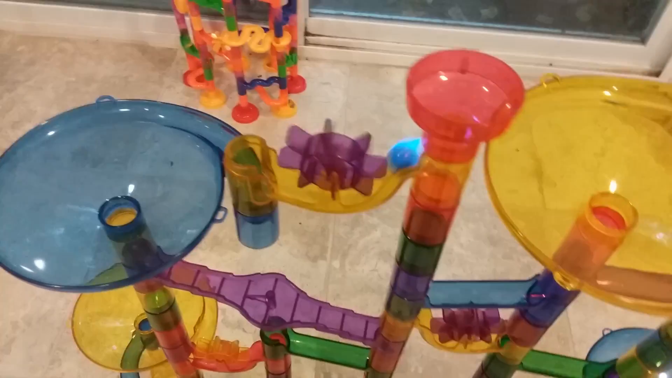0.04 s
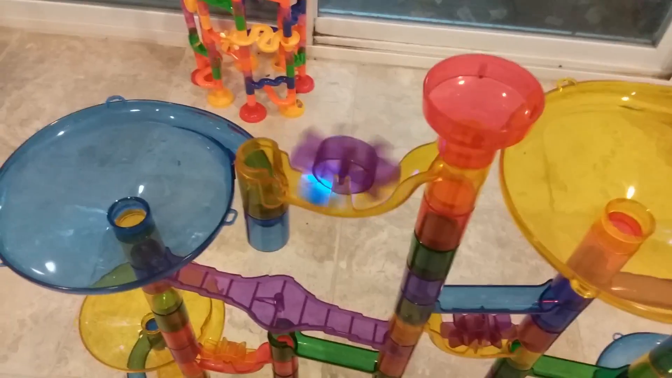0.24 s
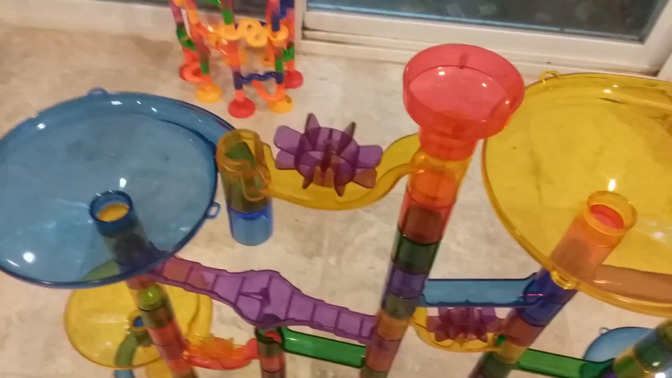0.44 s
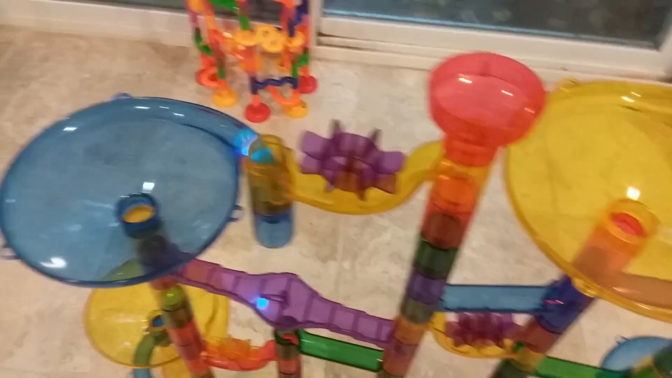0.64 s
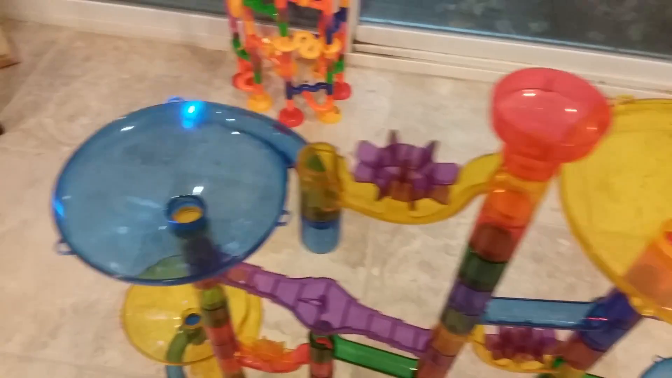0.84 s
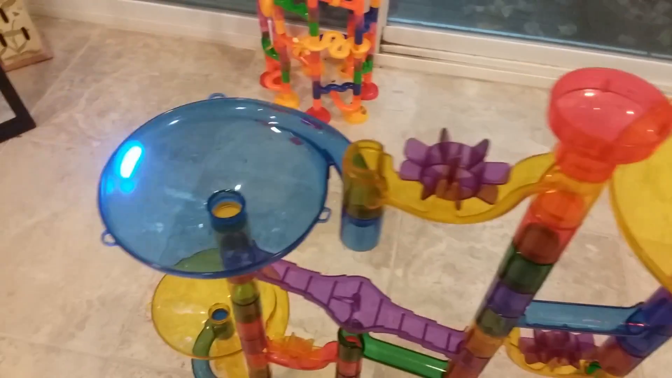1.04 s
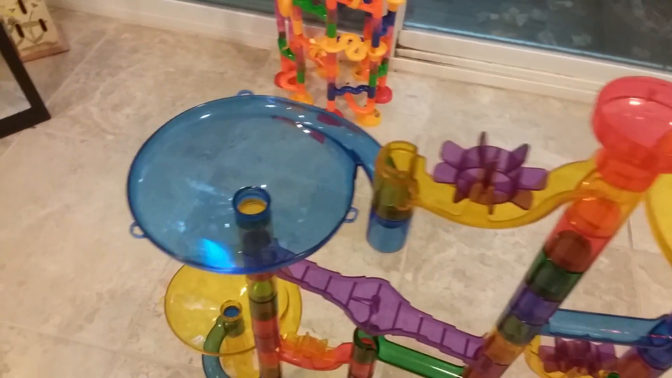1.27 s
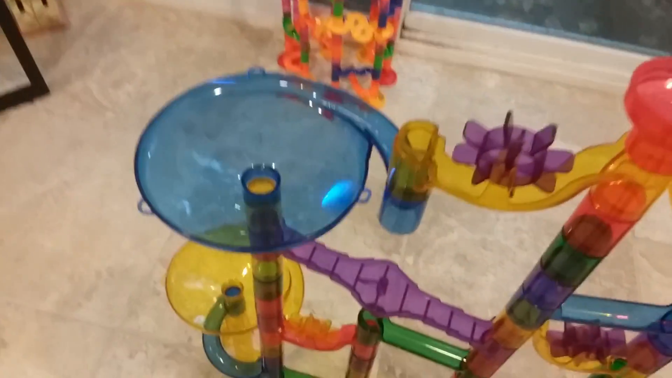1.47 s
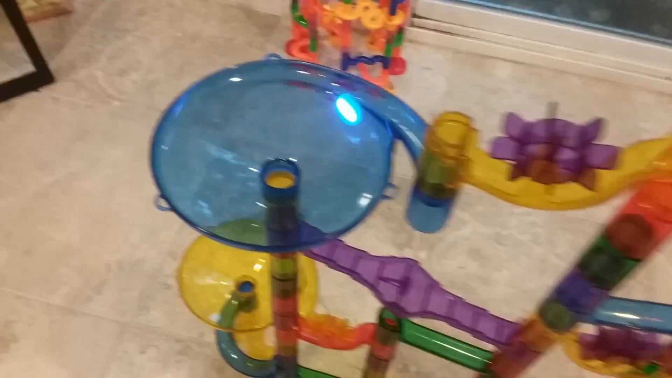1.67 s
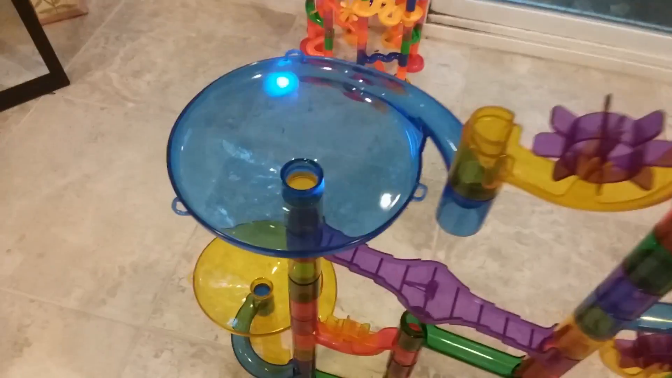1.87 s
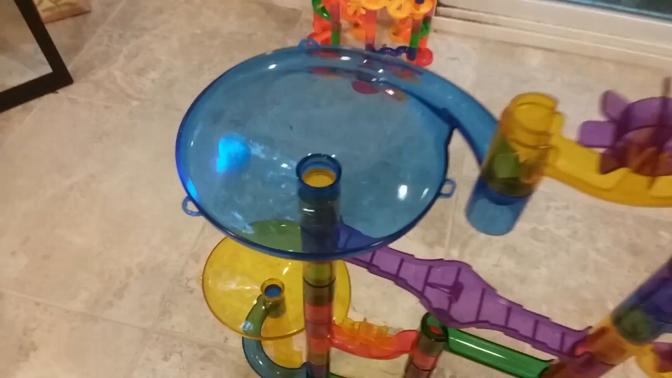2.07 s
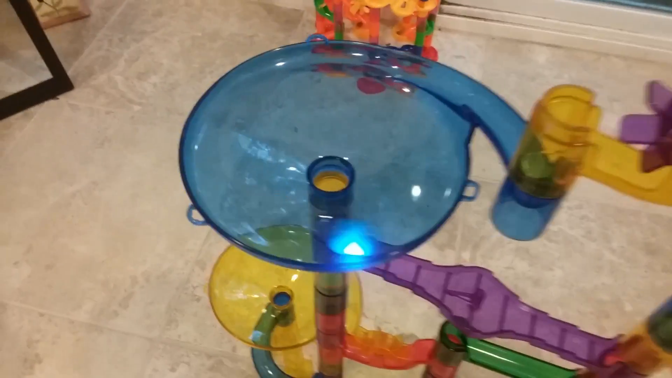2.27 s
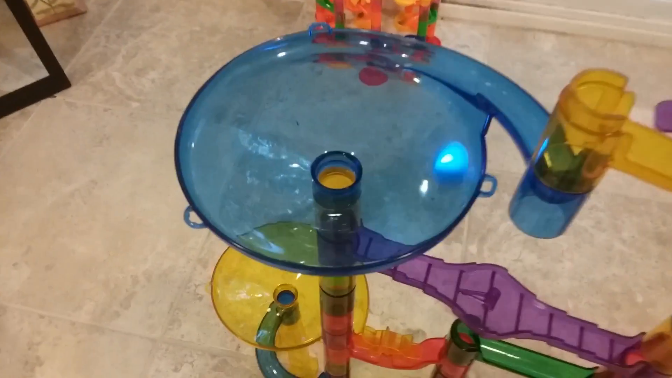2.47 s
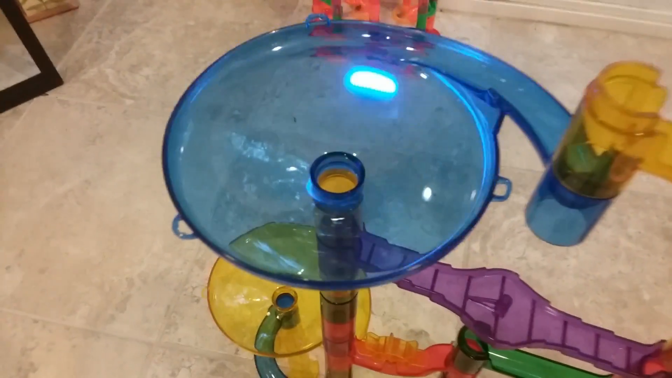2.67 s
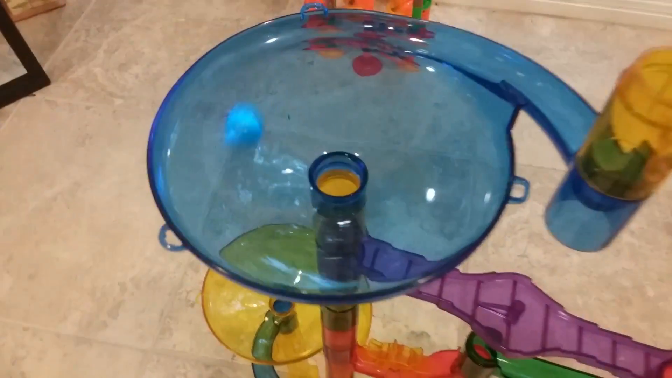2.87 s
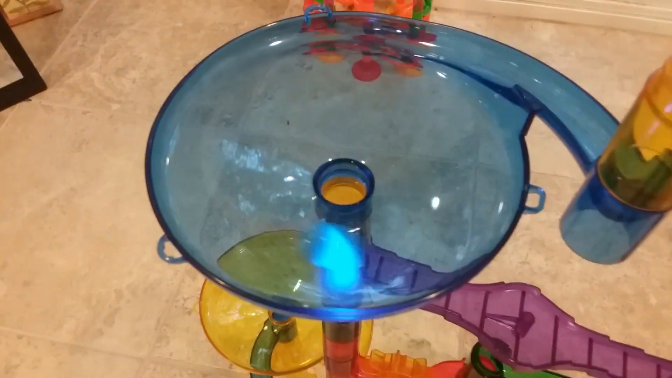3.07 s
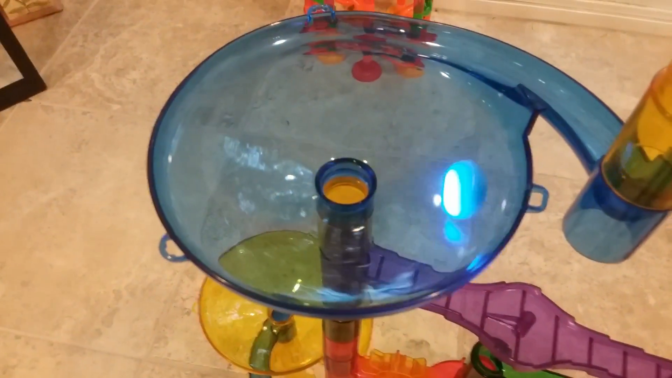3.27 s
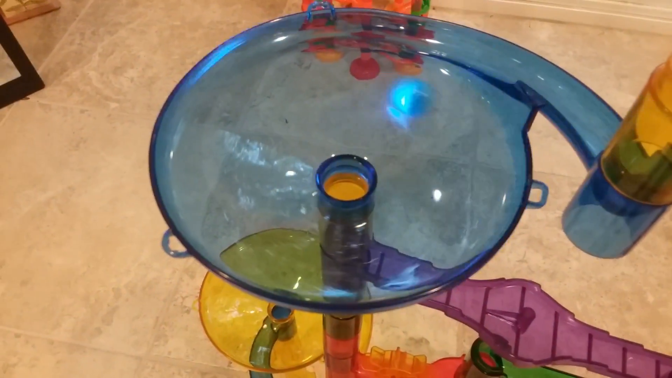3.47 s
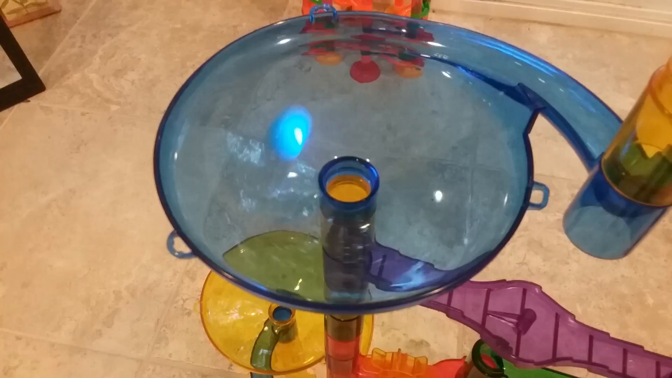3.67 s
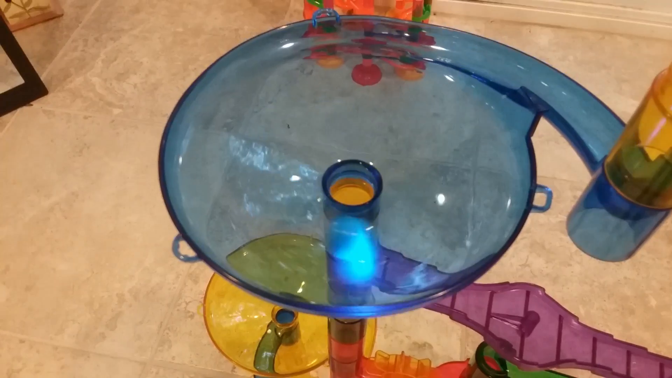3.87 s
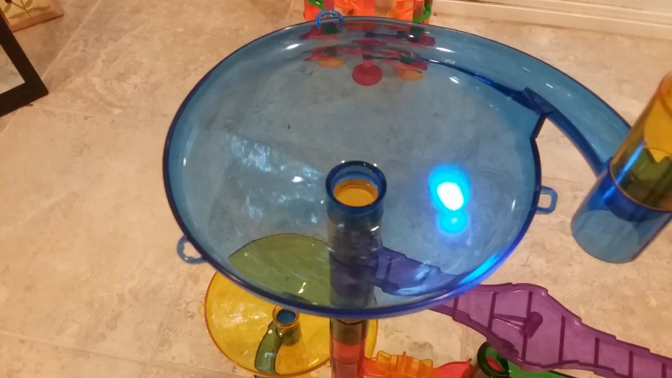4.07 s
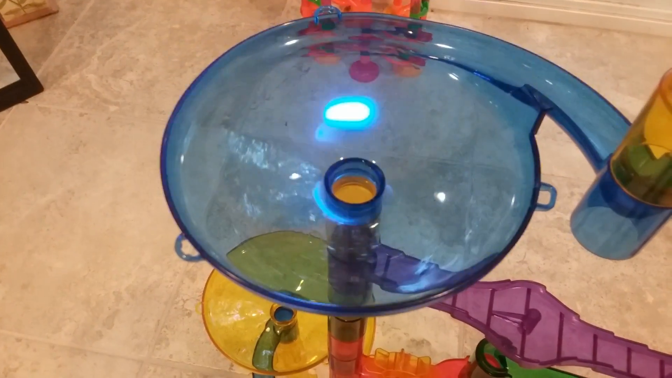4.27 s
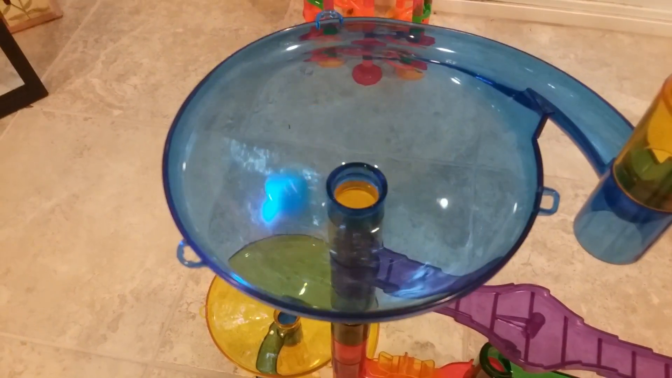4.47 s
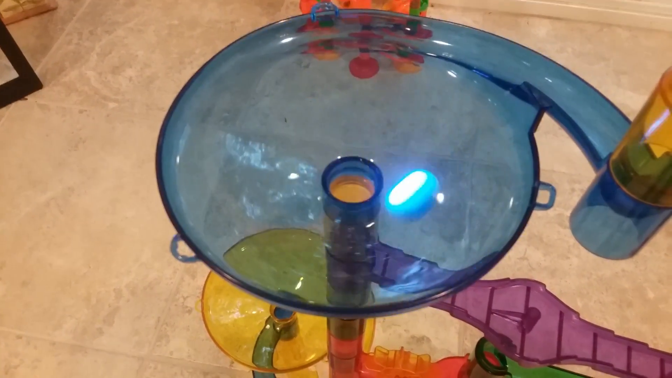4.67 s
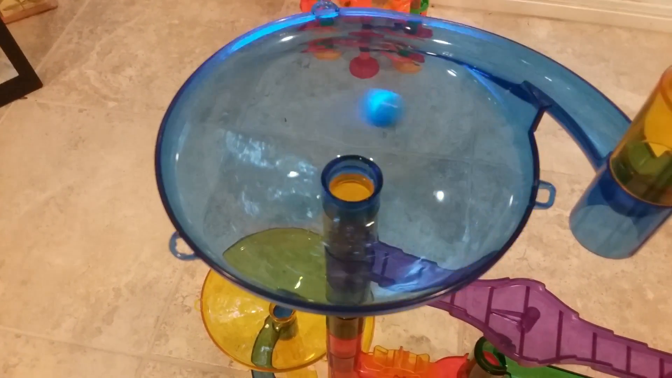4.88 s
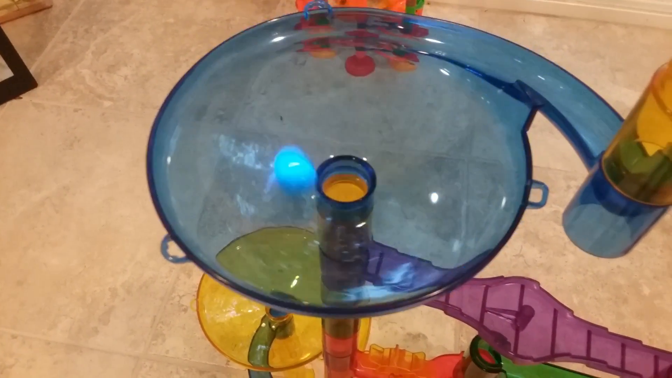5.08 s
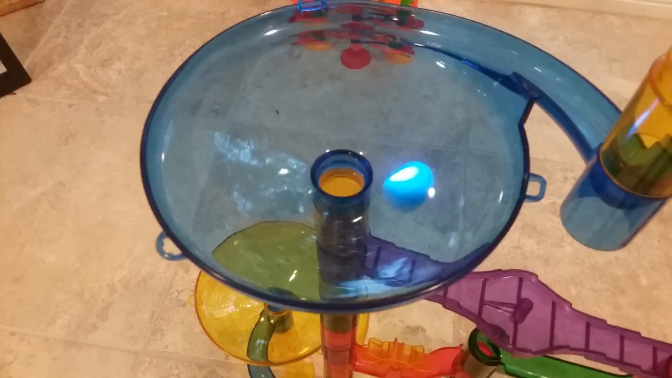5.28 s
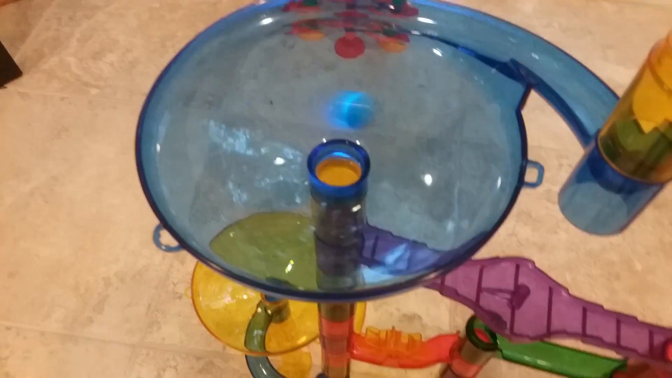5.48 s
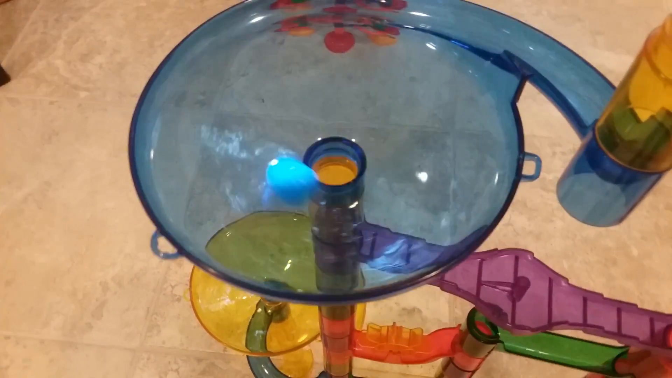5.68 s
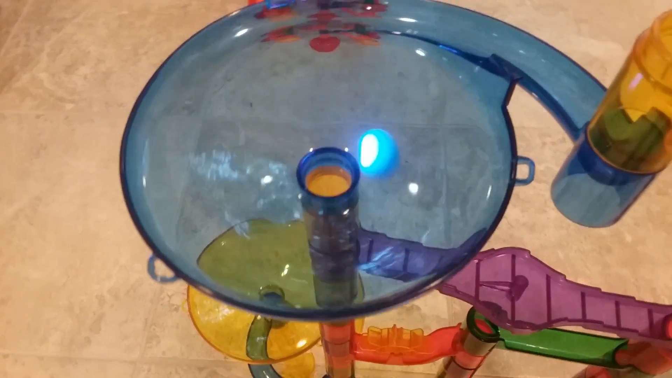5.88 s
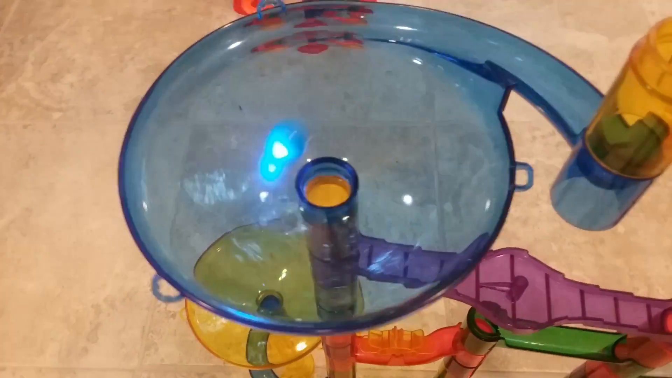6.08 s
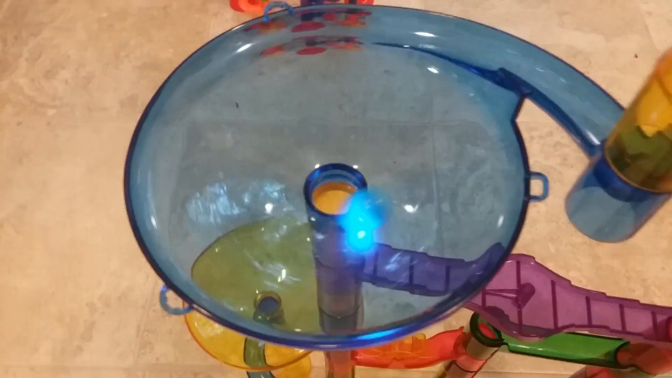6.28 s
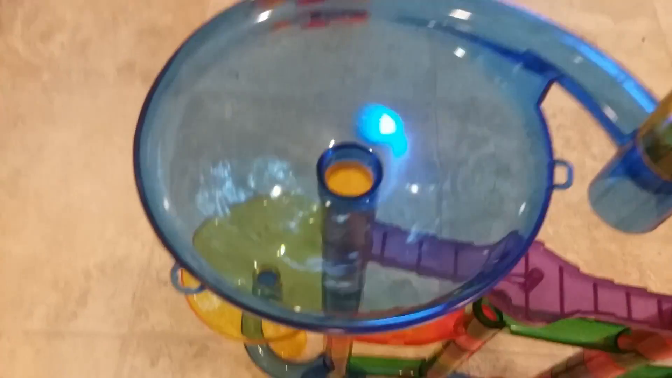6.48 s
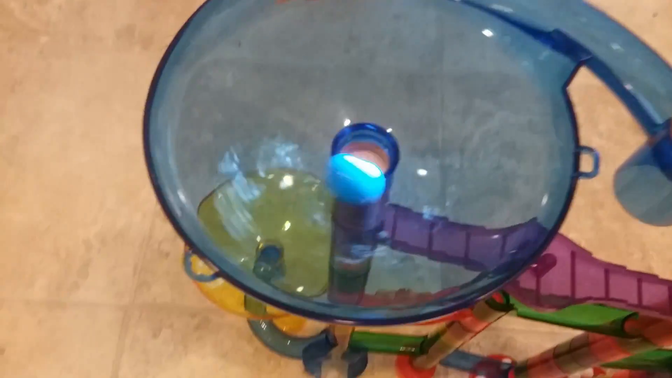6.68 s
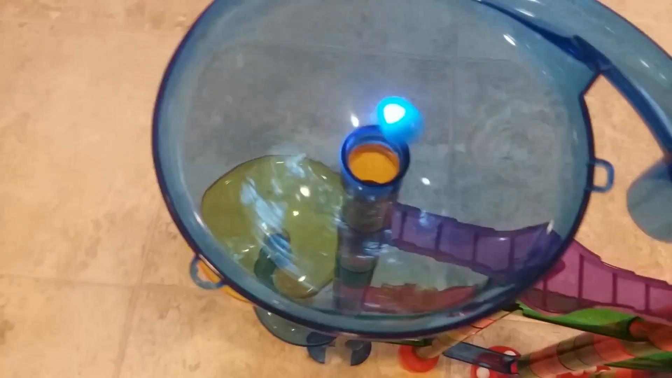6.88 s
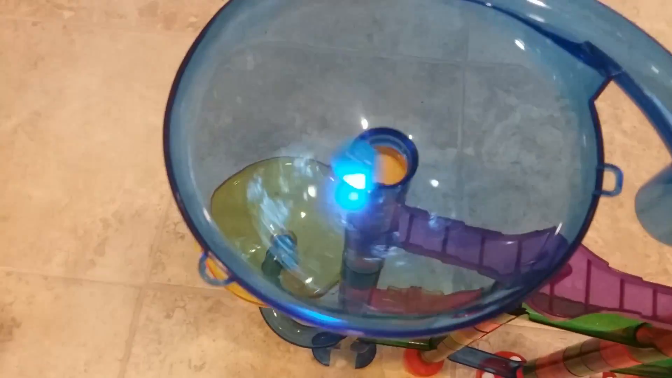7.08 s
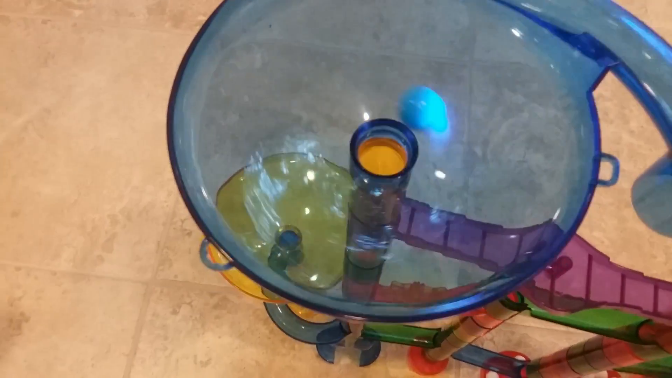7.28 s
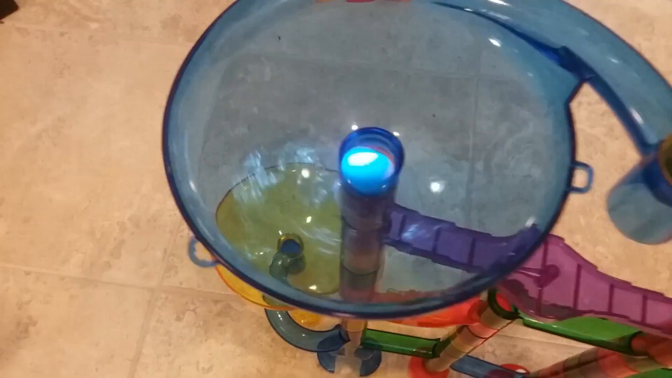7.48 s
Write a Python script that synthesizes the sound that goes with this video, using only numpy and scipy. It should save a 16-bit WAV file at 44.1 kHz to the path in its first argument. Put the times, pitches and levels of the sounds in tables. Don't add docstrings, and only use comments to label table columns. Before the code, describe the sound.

A hard marble clacks through a plastic paddle wheel and tube, then circles a thin plastic funnel with rapid irregular ticking and buzzy rolling.

```python
import sys
import numpy as np
from scipy import signal
from scipy.fft import rfft, irfft, next_fast_len
from scipy.io import wavfile
from scipy.ndimage import uniform_filter1d

SR = 44100
rng = np.random.default_rng(int(sys.argv[2]) if len(sys.argv) > 2 else 0)


def elevation(decibels):
    levels = np.asarray(decibels, float)
    return 10 ** (levels / 20)


def to_wav(sig):
    pcm = np.clip(np.atleast_2d(sig), -1, 1) * 32767
    pcm = np.round(pcm).astype(np.int16)
    wavfile.write(sys.argv[1], SR, pcm.T)


N = 332073


def evened(x):
    return x / np.sqrt(np.mean(x ** 2) + 1e-20)


def read(points, hz):
    f, value = np.transpose(points)
    return np.interp(np.log(hz + 1), np.log(f + 1), value)


def colour(x, points, sign=1, lag=((0, 0), (1, 0))):
    size = 2 * next_fast_len(N // 2 + 4096)
    hz, fine_hz = np.fft.rfftfreq(16384, 1 / SR), np.fft.rfftfreq(size, 1 / SR)
    log_gain = np.log(elevation(sign * read(points, hz)))
    mirrored = np.concatenate([log_gain, log_gain[-2:0:-1]])
    phase = signal.hilbert(mirrored).imag[:len(hz)] + np.interp(hz, *np.transpose(lag))
    response = np.interp(fine_hz, hz, np.exp(log_gain - 1j * phase))
    return irfft(rfft(x, size) * response, size)[..., :N]


def add(mix, s, sound):
    part = mix[..., max(round(s * SR), 0):][..., :sound.shape[-1]]
    part += sound[..., :part.shape[-1]]


def resonate(x, hz, *widths):
    moving = np.ndim(hz) > 0
    turn = np.exp(2j * np.pi * (np.cumsum(hz) if moving else hz) / SR)
    z = x * turn.conj() if moving else x
    for r in np.exp(-np.pi * np.array(widths) / SR):
        z = signal.lfilter([1 - r], [1, -r if moving else -r * turn], z)
    return 2 * (turn * z if moving else z).real


def bank(x, modes, shift=1):
    out = 0
    for k, (hz, width, db) in enumerate(modes):
        out = out + (-1) ** k * elevation(db) * resonate(x, hz * shift, 1.6 * width, 1.64 * width)
    return out


# (time [s], laps [turns])
LAPS = [(0, -.5), (2.0, 1.5), (2.8, 2.5), (3.65, 3.5), (4.38, 4.5), (5.0, 5.5), (6.1, 7.5), (7.0, 9.5),
        (7.58, 11.1)]


def lean(t, late=0):
    return np.cos(2 * np.pi * (np.interp(t, *np.transpose(LAPS)) - late))


WALL_HZ, LEAN_HZ = 1620, 186
# (time [s], peak level [dB], loudest mode
# [Hz], crack [dB])
SEAM_TICKS = [(0.6446, -31, 1600, -7), (0.7358, -27.5, 1375, -7), (0.7434, -26.5, 1150, -4),
              (0.7512, -27.5, 1390, -18), (0.839, -23, 1320, -14.5), (0.849, -26, 2690, -9),
              (0.9494, -25, 1280, -8), (0.9573, -21, 1140, -9), (1.0046, -24, 1480, -14),
              (1.041, -23, 1470, -5), (1.0555, -17.5, 1370, -9), (1.29, -20, 1620, -9.5),
              (1.3102, -24, 1600, -14), (1.425, -20, 1570, -8.5), (1.5938, -27.5, 2260, -18),
              (1.6492, -27, 2320, -20), (1.6957, -23, 2390, -15), (1.7195, -27, 2430, -23),
              (1.7626, -21, 2380, -23), (1.794, -28.5, 2430, -29), (1.8128, -22, 2420, -17.5),
              (1.8776, -22, 1442, -20.5), (1.9237, -23.5, 1910, -18), (2.2948, -12.5, 1773, -8),
              (2.5418, -15.5, 1740, -15.5), (2.59, -23, 1600, -16), (2.598, -15, 1910, -17.5),
             (2.6663, -22.5, 1500, -20), (2.6964, -26, 1500, -19), (2.7162, -21, 1830, -17.5),
             (2.7836, -20, 1640, -31), (2.7945, -20, 1410, -55), (2.8365, -14.5, 1540, -11.5),
             (2.9034, -19, 1620, -13), (2.9143, -17.5, 2580, -13), (2.9764, -24, 1680, -13),
             (3.0234, -22.5, 2160, -20), (3.0336, -16, 2130, -12.5), (3.1087, -23.5, 1635, -26),
             (3.149, -23.5, 1620, -10.5), (3.2096, -23.5, 1590, -48), (3.2178, -18.5, 1544, -5),
             (3.2911, -23.5, 1760, -14), (3.3586, -12, 1880, -10), (3.3942, -22.5, 1990, -35),
             (3.4184, -27, 1680, -20), (3.4847, -19.5, 1660, -36), (3.4978, -7.5, 2100, -3.5),
             (3.5554, -19.5, 1485, -20), (3.614, -24.5, 1540, -13), (3.6243, -11, 1492, -10.5),
             (3.677, -18, 1463, -17),
              (3.7523, -17, 1623, -16), (3.8071, -19, 2800, -12), (3.8873, -16, 1620, -72),
               (3.9574, -20, 1834, -19), (4.0314, -19, 1580, -34), (4.0429, -19.5, 1760, -20),
               (4.1081, -26, 2060, -31), (4.1763, -18, 1620, -10), (4.2933, -23.5, 1640, -14),
               (4.3041, -32.5, 1360, -36), (4.3216, -36, 1320, -16), (4.4448, -20, 1442, -46),
               (4.5246, -21, 1750, -23), (4.5852, -16, 1750, -25), (4.7088, -25, 1770, -21),
               (4.7269, -26.5, 2620, -17), (4.8771, -18, 1520, -11.5), (4.9187, -29.5, 1456, -19),
               (5.0995, -23.5, 1360, -10), (5.1316, -22.5, 1640, -15), (5.1608, -15.5, 2910, -12.5),
               (5.1698, -19, 1620, -16), (5.2604, -24, 1660, -36), (5.4027, -33.5, 1520, 5),
               (5.4101, -20, 1510, -47), (5.474, -22.5, 2370, -18), (5.5511, -26, 1480, -39),
               (5.6228, -14.5, 1453, -7.5), (5.7483, -28, 2870, -27), (5.7825, -23, 2700, -12.5),
              (5.8057, -21.5, 1530, -66), (5.8604, -30, 1600, -5), (5.8696, -21.5, 1950, -81),
              (5.8954, -29.5, 1850, -3), (5.9394, -24, 2240, -26), (5.9718, -29, 2250, -18),
              (6.0202, -24.5, 1470, -31), (6.0264, -27, 1450, -10), (6.1, -28, 1430, -19),
              (6.1814, -33, 1460, -54), (6.2492, -23.5, 3000, -21), (6.2592, -12, 1590, -15.5),
              (6.342, -33, 1810, -10), (6.4318, -18, 1434, -14.5), (6.5311, -28.5, 2260, -8),
              (6.5829, -17.5, 1442, -11), (6.754, -25, 1457, -23), (6.8254, -24, 1620, -19),
              (6.8364, -26, 1450, -20), (6.8748, -27.5, 2200, -23), (6.9107, -27, 2270, -21),
              (7.0055, -27.5, 1477, -35), (7.0499, -31, 2600, -35), (7.0848, -20.5, 1460, -14),
              (7.1686, -25, 1917, -23), (7.2444, -37, 1510, -24), (7.3332, -25.5, 3700, -27),
              (7.3464, -26, 1480, -21), (7.4111, -24.5, 2740, -16), (7.4435, -29.5, 1460, -18)]
# (time [s],
# peak level [dB], loudest mode [Hz])
MORE_TICKS = [(0.6238, -40, 2450), (0.7928, -30, 1390), (0.8303, -32, 1430), (0.8826, -41, 1460),
              (0.8957, -30, 1470), (1.1249, -24.5, 1320), (1.3934, -32.5, 2710), (1.4388, -40, 1750),
              (1.7024, -21.5, 2320), (1.8309, -28, 1950), (1.9082, -36, 1580), (1.976, -33, 1340),
              (1.9968, -34, 1640), (2.0391, -26, 1700), (2.0513, -33, 1670), (2.0711, -30.5, 1910),
              (2.1719, -32.5, 1940), (2.2073, -30, 2850), (2.2187, -26.5, 1700), (2.4431, -41, 1300),
              (2.6146, -36, 1720), (2.6903, -24, 1560), (2.7166, -39, 1420), (2.8294, -30, 1350),
              (3.0069, -24, 2380), (3.0792, -26.5, 1790), (3.1039, -30, 1900), (3.159, -13, 1600),
              (3.1842, -41, 1840), (3.2817, -28, 1810), (3.347, -28, 1750), (3.4252, -18.5, 1507),
              (3.55, -27, 1470), (3.578, -24, 1430), (3.6159, -19, 1700), (3.663, -22.5, 1580),
              (3.7379, -33, 1470), (3.7715, -24, 2220), (3.7956, -25.5, 1740), (3.8193, -26, 1570),
              (3.9031, -27, 1780), (3.9398, -25, 1550), (4.0222, -25.5, 2770), (4.0924, -43, 1510),
              (4.106, -28, 2030), (4.1257, -40, 1920), (4.1651, -23, 1800), (4.224, -29, 2320),
              (4.2386, -26.5, 2580), (4.2605, -36, 1480), (4.3215, -49, 1324), (4.6692, -25.5, 1600),
              (4.7219, -23, 1830), (4.8056, -42, 1500), (4.8184, -28.5, 1470),
              (4.846, -31, 1620), (4.9995, -25, 1430), (5.0496, -29, 1420), (5.1208, -26, 1830),
              (5.144, -26, 1760), (5.1558, -37, 1890), (5.1937, -38, 2920), (5.205, -28, 2900),
              (5.3942, -35.5, 2000), (5.4668, -28.5, 2530), (5.5943, -34, 2620), (5.6119, -37, 1470),
              (5.7094, -28.5, 1620), (5.7382, -27, 1670), (5.8386, -37, 1520), (5.8454, -27.5, 1730),
              (6.051, -41, 2240), (6.1308, -33, 2640), (6.1582, -33, 2540), (6.174, -27, 1410),
              (6.2393, -34, 1700), (6.311, -27.5, 1620), (6.3149, -27.5, 1520), (6.351, -41, 1800),
              (6.3787, -33, 1940), (6.4813, -33.5, 1520), (6.5056, -30, 1490), (6.577, -42, 1360),
              (6.673, -31, 1210), (6.7443, -33, 1820), (6.7884, -35, 2800), (6.8679, -35, 2260),
              (7.061, -33.5, 2470), (7.0797, -28, 1130), (7.1503, -33, 1800), (7.2409, -31.5, 1508),
              (7.3997, -31, 1890), (7.4053, -44, 1830), (7.4354, -34, 1520)]
BRIGHTER_TICKS = [(0.685, -35, 1280), (1.0701, -25, 1250), (1.493, -28, 1340), (2.101, -25.5, 1370),
                  (4.3786, -26.5, 1330), (4.565, -24, 1600), (4.6824, -30.5, 1750), (4.9646, -25.5, 1520)]


def tick_rows():
    hits = SEAM_TICKS
    hits = hits + [(*row, -18.5) for row in MORE_TICKS]
    hits = hits + [(*row, -12) for row in BRIGHTER_TICKS]
    rows = []
    for s, db, hz, crack_db in hits:
        wall_hz = WALL_HZ + LEAN_HZ * lean(s)
        modes = (wall_hz, hz, 9.5) if hz > 2060 else (hz, wall_hz * 1.45, -9.5)
        rows.append((s, db + 1.5, *modes, crack_db + 0.5))
    return rows


# (frequency [Hz], width [Hz], level [dB])
RIM = [(2200, 246, 5), (2620, 940, -5), (2900, 400, 4), (3468, 1820, -7), (4085, 1100, -8)]


def ticks():
    rows, t60, count = tick_rows(), 0.033, len(RIM)
    t, out = np.arange(2048, dtype=np.float32) / SR, np.zeros((2, N))
    chance = rng.random((len(rows), 3, 16, 1))
    cracks = rng.standard_normal((len(rows), 2, 2048))
    swaps = rng.uniform(0.091, 1, (len(rows), 16, 1))
    band = signal.butter(2, (2800, 9500), "band", fs=SR)
    rim_modes_hz = np.array(RIM)[:, :1]
    for (s, db, wall_hz, rim_hz, rim_db, crack_db), (place, size, life), noise, swap in zip(
            rows, chance, cracks, swaps):
        wall = elevation(-max(rim_db, 0) - 60 * t / t60) * np.sin(2 * np.pi * wall_hz * t)
        rim_t60 = t60 * 1100 / rim_hz
        rim = elevation(min(rim_db, 0) + 3.5 - 60 * t / rim_t60) * np.sin(2 * np.pi * rim_hz * t)
        body = elevation(-17 - 60 * t / 0.09) * np.sin(2 * np.pi * 602.5 * t)
        crack = elevation(crack_db + 7.5) * signal.lfilter(*band, noise * np.exp(-t / 0.002))

        place = (np.arange(len(place))[:, None] + place) / len(place)
        near_hz = 1300 * (4100 / 1300) ** place
        near_t60 = t60 * (0.35 + .5 * life) * 1500 / near_hz
        near_db = -4.5 + 0.32 * crack_db * place - 10 * size
        near = elevation(near_db - 60 * t / near_t60) * np.sin(2 * np.pi * (near_hz * t + 3 * life))

        shell_hz = rim_modes_hz * (1 + 0.11 * (life[:count] - .5))
        shell_db = -1 + 0.44 * crack_db * np.log2(shell_hz / shell_hz[0])
        shell = elevation(shell_db - 60 * t / t60 * shell_hz / 2000) * np.sin(2 * np.pi * shell_hz * t)
        shell = np.array([elevation(-16 * size[:count, 0]), elevation(-16 * size[-count:, 0])]) @ shell

        pair = shell + wall + rim + body + crack + np.array([near.sum(0), (2.0 * swap * near).sum(0)])
        press_s = 0.00062 + 0.000072 * np.clip(-15.5 - crack_db, 0, 25)
        pair *= (1 - np.exp(-t / press_s)) * (1 - (t / t[-1]) ** 4) * elevation([[0], [-4]])
        add(out, s, elevation(db) * pair / abs(pair[0]).max())
    return out


# (time [s], pressure [dB], nearness to the frame [0-1], chatter [dB])
ROLL = [(0, -55, 0.8, 2), (.42, -62, 0, 6), (.72, -59, 1, 8), (.97, -53, 1, 5), (1.5, -52, 0.94, 5.5),
        (1.72, -54, 0.8, 4.5), (2.05, -44.5, 0.17, -5.5), (2.45, -51.5, 1, 3.5), (2.75, -40.5, 0.07, -6),
        (3.3, -46.5, 0.82, -4), (3.7, -45.5, 0.05, -6.5), (4.351, -45.5, 0.14, -4.5),
        (4.8, -49, 0.43, -0.5), (5.4, -49.5, 0.18, -5.5), (5.85, -50.5, 0.51, -2.5), (6.4, -51, 0.41, -5),
        (7.2, -57.5, 0.84, 3), (7.53, -58, 0.59, -3.5)]
# (frequency [Hz], width [Hz], level [dB])
HUM = [(598.2, 42, 12.5), (730, 232, -4.5)]
FRAME = [(301, 108, -1), (523, 240, -5.5), (853, 118, 10.5), (1130, 820, -12.5), (1121, 28.5, 9.5),
         (1248, 31, 5.5)]
WALL = [(1346, 46, -27), (1473, 49, 7.5), (1600, 36, 9), (1750, 158, 5), (1844, 30, 5)]
FIZZ = [(5100, 5700, -4.5), (7550, 530, 5)]


def rolling():
    t, (s, db, nearness, chatter_db) = np.arange(N) / SR, np.transpose(ROLL)
    press = np.interp(t, s, db + 47)
    near = np.interp(t, s, nearness)
    wall_hz = WALL_HZ + LEAN_HZ * lean(t)
    chatter = np.interp(t, s, chatter_db) - lean(t)

    hum_db = -48.5 + 0.64 * press + 8 * near + 0.5 * lean(t, 0.17)
    frame_db = -59 + 0.65 * press + 18.5 * near
    buzz_db = -41.5 + press + 3 * lean(t, 0.26)
    hiss_db = -45 + press + chatter
    flutter_db = 2.8 * evened(uniform_filter1d(rng.standard_normal(N), 5000))
    fizz_db = -58 + 0.95 * press + 0.89 * chatter + flutter_db

    bumps = evened(uniform_filter1d(rng.standard_normal(N), 500))
    size_db = 1.57 * np.minimum(rng.exponential(1, N), 5) + 3.27 * np.clip(bumps, -3, 1.5)
    size = elevation(size_db) * (rng.random(N) < 3500 / SR)
    grit = size * rng.choice([-1., 1.], (3, N))
    apart = 0.41 * grit[0] + 0.95 * grit[1:]
    close = 1.0 * grit[0] + 0.37 * grit[1:]
    shared = 1.02 * grit[0] + 0.24 * grit[1:]

    hum = elevation(hum_db) * evened(bank(shared, HUM))
    frame = elevation(frame_db) * evened(bank(shared, FRAME))
    wall = 0
    for mode in WALL:
        drive_db = 3 * (wall_hz - WALL_HZ) * (mode[0] - WALL_HZ) / LEAN_HZ ** 2
        wall = wall + bank(close * elevation(drive_db), [mode])
    wall = evened(wall) + elevation(-7.5) * evened(resonate(close, wall_hz, 120, 87))
    fizz = elevation(fizz_db) * evened(bank(apart, FIZZ))
    rim = evened(bank(apart, RIM, (wall_hz / 1600) ** 0.13))
    return hum + frame + fizz + elevation(buzz_db) * evened(wall) + elevation(hiss_db) * rim


# (middle time [s], length [s], level
# [dB], pitch [Hz])
SKIDS = [(0.98, 0.083, -44, 3900), (1.072, 0.12, -40, 3850), (0.884, 0.33, -38, 1443),
         (1.132, 0.14, -34.5, 1410), (1.233, 0.084, -31.5, 1700), (1.436, 0.033, -40, 1700),
         (2.21, 0.044, -34.5, 1750), (2.832, 0.096, -31, 1600), (3.68, 0.023, -21.5, 1465),
         (4.047, 0.044, -31.5, 1400), (4.317, 0.059, -24.5, 1445), (4.624, 0.074, -34, 1580),
         (5.555, 0.029, -30.5, 1416), (5.87, 0.083, -27, 1766), (6.178, 0.061, -34, 1458),
         (6.336, 0.11, -38.5, 1750), (6.999, 0.026, -32, 1460)]


def skids():
    out, t = np.zeros((2, N)), (np.arange(8192) - 4096) / SR
    for (s, length, db, hz), grit in zip(SKIDS, rng.standard_normal((len(SKIDS), 8192))):
        swell = np.exp(-(t / length * 2.8) ** 2)
        sing = evened(resonate(grit ** 3, hz, hz / 16, hz / 16))
        add(out, s + t[0], elevation(db - 4.5) * (swell * sing)[None])
    return out


# (time [s], peak level [dB], pitch of the struck spot [Hz], crack over peak [dB])
KNOCKS = [(0.0004, -2.5, 5430, -2), (0.0022, -13, 2500, -19), (0.014, -18, 3380, -5),
          (0.02, -20, 3530, -21), (0.03, -20, 5160, -5), (0.043, -18, 2600, 6), (0.072, -25.5, 3700, -13),
          (0.1491, -24, 3500, -14), (0.153, -32, 3500, -12), (0.166, -24.5, 3000, -19),
          (0.2642, -33, 2580, -27), (0.2962, -2.5, 3420, -10), (0.3011, -6, 3730, -25),
          (0.305, -13, 2500, -21), (0.32, -8.5, 5500, -12), (0.321, -13, 2050, -24), (0.3373, -5, 5500, -4),
          (0.3517, 2, 3400, -7.5), (0.357, -11.5, 3450, -24), (0.363, -30, 3000, -18),
          (0.367, -14, 3670, -24), (0.378, -21, 7300, -28), (0.39, -35, 3080, -20), (0.51, -29, 1700, -27)]
# (frequency [Hz], level [dB], t60 [s])
WHEEL = [(557, -12, 0.068), (670, -14.5, 0.13), (794, -8, 0.079), (1280, -16, 0.062), (1700, -12, 0.053),
         (2090, -15, 0.029), (2500, -0.5, 0.015), (2900, -2.5, 0.012), (3380, 2, 0.0092), (3600, 0, 0.011),
         (3900, -7, 0.024), (4440, -20, .014), (5400, -7.5, 0.011), (7300, -7, 0.011)]


def wheel():
    t, out, (hz, db, t60) = np.arange(4096) / SR, np.zeros((3, N)), np.transpose(WHEEL)[..., None]
    chance = rng.standard_normal((len(KNOCKS), 2, len(WHEEL), 1))
    cracks = rng.standard_normal((len(KNOCKS), 2, 4096))
    band = signal.butter(2, (4500, 14000), "band", fs=SR)
    for (s, peak_db, spot_hz, crack_db), (tune, far), noise in zip(KNOCKS, chance, cracks):
        favour_db = 13 * np.exp(-(np.log2(hz / spot_hz) / 0.29) ** 2)
        ring = elevation(db + favour_db - 60 * t / t60) * np.sin(2 * np.pi * hz * (1 + 0.041 * tune) * t)
        modes = ring * (1 + 0.57 * np.exp(-t / 0.0004))
        crack = elevation(crack_db + 28.0) * signal.lfilter(*band, noise * np.exp(-t / 0.0015))
        pair = np.array([modes.sum(0), (elevation(3.2 * far) * modes).sum(0)]) + crack
        pair *= 1 - np.exp(-t / 0.0002)
        rattle_db = peak_db - 3 - 7 * (s < .2)
        add(out[2], s, elevation(rattle_db) * noise[1] * np.exp(-t / 0.0018))
        add(out[:2], s, elevation(peak_db - 2.0) * pair / abs(pair[0]).max() * elevation([[0], [-1.5]]))
    return out


# (frequency [Hz], t60 [s])
ROOM = [(300, 0.88), (1000, 0.44), (3500, 0.61), (7000, 0.51), (14000, 0.31)]
# (frequency [Hz], level [dB])
WHEEL_GIVES = [(400, -7.5), (900, -4.5), (1500, -7.5), (2500, -5), (3500, 3.5), (4500, -8), (8000, -26.5),
               (14000, -23)]
WALLS_GIVE = [(500, -3.5), (1500, -4.5), (3200, -4.5), (4500, -3.5), (6300, 7), (8000, 15), (12000, 16)]


def room(rattle, near_ticks):
    sent = colour(rattle, WHEEL_GIVES) + elevation(-3.5) * uniform_filter1d(near_ticks, size=6)
    taps = np.zeros((2, SR))
    at = np.arange(200, SR - 20, 20) + rng.integers(0, 20, (2, (SR - 201) // 20))
    np.put_along_axis(taps, at, rng.choice([-1., 1.], at.shape), 1)
    hz, t, z = signal.stft(taps, SR, nperseg=256)
    tail = signal.istft(z * elevation(-60 * t / read(ROOM, hz)[:, None]), SR, nperseg=256)[1]
    wet = signal.fftconvolve(sent, tail / np.linalg.norm(tail[0]), axes=1)[:, :N]
    return colour(wet, WALLS_GIVE) * elevation([[0], [3]])


# (frequency [Hz], level [dB])
MIC = [(100, -22), (400, -12), (1000, -2), (5000, 3.5), (6400, -5), (7700, -7.5), (9500, -25), (16000, -25)]
# (frequency [Hz], left over right [dB])
SHADOW = [(250, 1), (600, 3.5), (1200, 5.5), (2500, 10.5), (4000, 12), (6000, 10.5), (9000, 3),
          (14000, -0.5)]
# (frequency [Hz], phase lag [radians])
RIGHT_LAG = [(0, -0.4), (800, 0.3), (1400, .9), (1900, 1.1), (2600, 5.7), (3400, 8), (16500, 32)]


def microphone(sound):
    left, right = colour(sound, MIC)
    return np.array([left, colour(right, SHADOW, -1.043, RIGHT_LAG)])


# (peak time [s], level [dB], rise [s], fall [dB/s])
GUSTS = [
    (1.12, -77, .2, 160),
    (2.329, -51, 0.059, 26),
    (4.44, -64, 0.05, 204),
    (4.85, -76, 0.18, 42),
    (5.15, -79, .15, 27),
    (5.48, -80, 0.19, 23),
    (6.55, -78, 0.63, 60),
]
# (peak time [s], level [dB], frequency [Hz])
EDDIES = [(2.337, -38, 90.5), (2.358, -30, 103), (2.388, -47, 100), (2.425, -31.5, 99), (2.467, -37.5, 120),
          (2.504, -38, 80), (2.527, -36, 138), (2.558, -44, 70), (2.584, -39, 119), (2.636, -41, 101),
          (2.671, -50, 90), (2.705, -42, 89), (2.771, -50, 89), (2.836, -50, 119)]


def puff():
    s, db, rise, fall = np.transpose(GUSTS)[..., None]
    u = np.arange(N) / SR - s
    drop_db = np.where(u < 0, -36 * u / rise, fall * u + 79 * np.maximum(u - 0.38, 0))
    level = elevation(-104) + elevation(db - drop_db).sum(0)
    gust = colour(rng.standard_normal((2, N)),
                  [(25, -56.0), (60, 0.5), (110, 3.0), (200, -2.5), (350, -12.5), (700, -57.5)])
    out, t = evened(gust) * level * elevation([[-9], [6]]), np.arange(-2048, 2048) / SR
    for (s, db, hz), turn in zip(EDDIES, rng.random(len(EDDIES))):
        eddy = elevation(db) * np.exp(-(t * hz / 0.84) ** 2) * np.cos(2 * np.pi * (hz * t + turn))
        add(out, s + t[0], eddy * elevation([[-40], [1.5]]))
    return out


# (frequency [Hz], level [dB per Hz])
AIR = [(20, -35), (50, -14.5), (105, -8.5), (200, -19.5), (400, -26.5), (1500, -18), (6000, -41),
       (16000, -36)]


def floor():
    return elevation(-66.5) * evened(colour(rng.standard_normal((2, N)), AIR))


def scene():
    knocks, ticking = wheel(), ticks()
    wet = room(knocks[2], ticking[[0, 0]])
    marble = microphone(ticking + rolling() + skids() + knocks[:2] + wet)
    return marble + puff() + floor()


def roll_off(x):
    return signal.sosfilt(signal.butter(12, 16970, fs=SR, output="sos"), x)


def record(dry):
    ceiling = 1.2
    loud = ceiling * np.tanh(dry / ceiling)
    limited = signal.oaconvolve(loud, signal.firwin(255, 15900, fs=SR)[None], "same")
    return roll_off(limited)


dry = scene()
out = record(dry)
to_wav(out)
```